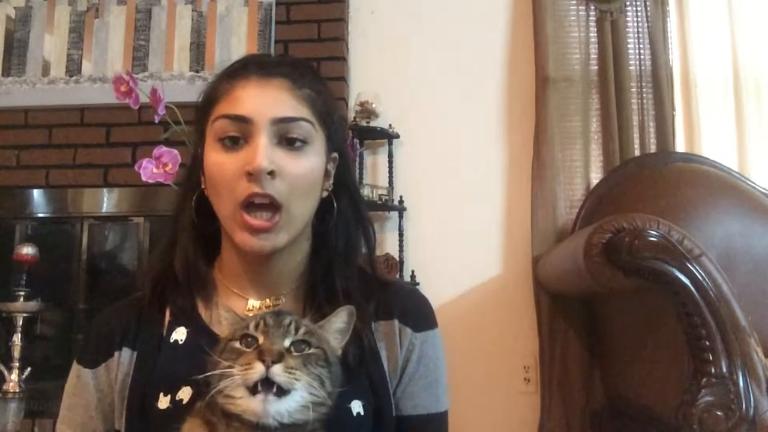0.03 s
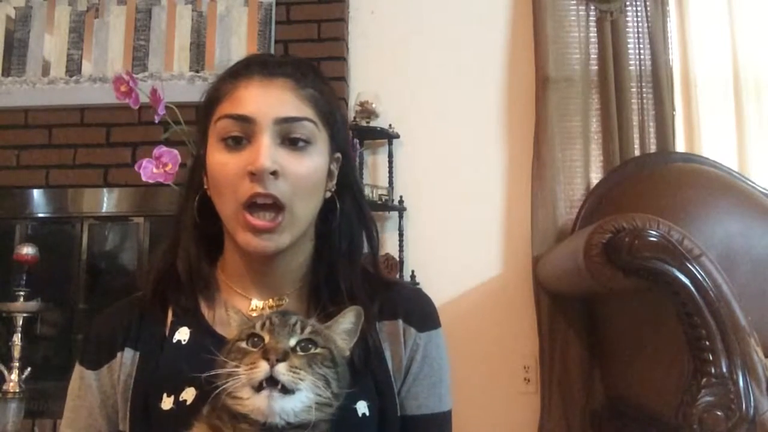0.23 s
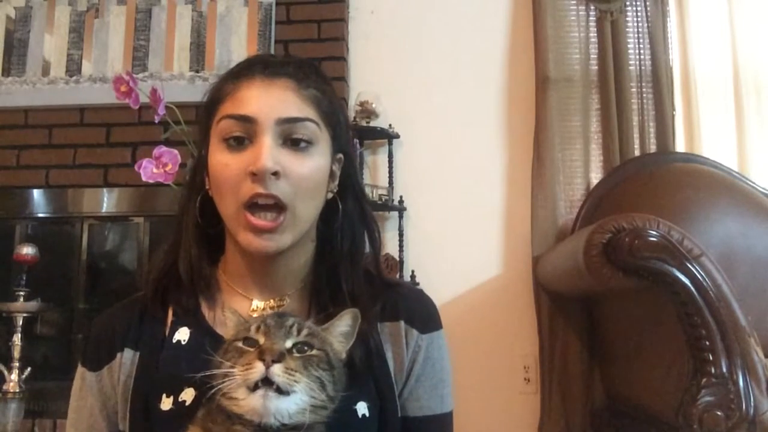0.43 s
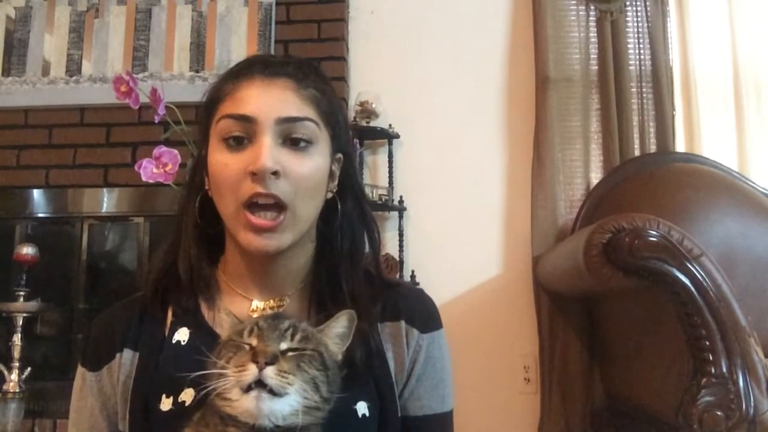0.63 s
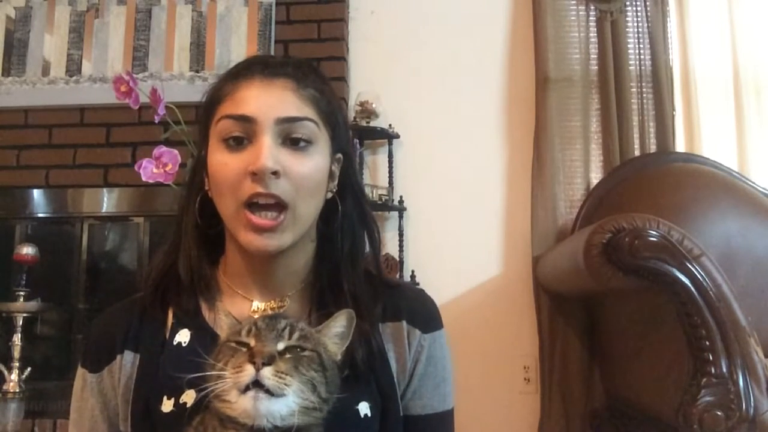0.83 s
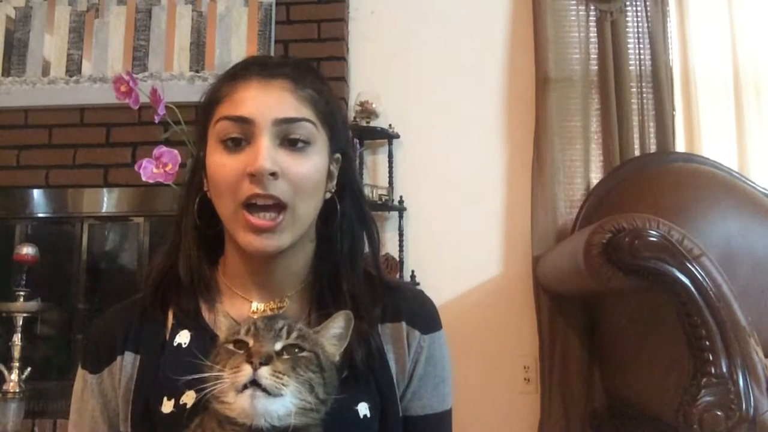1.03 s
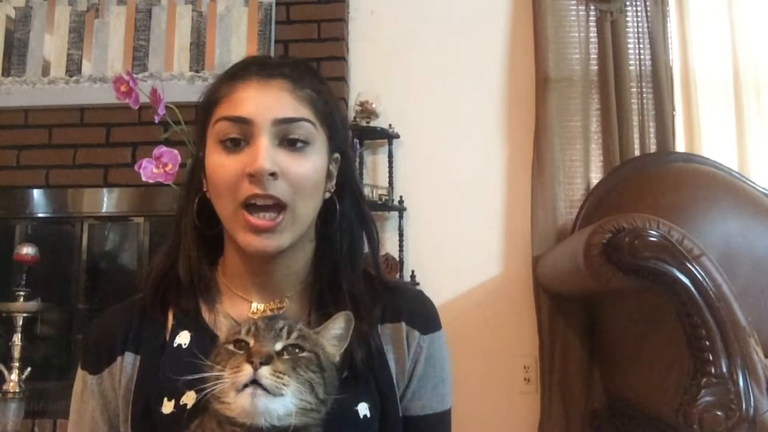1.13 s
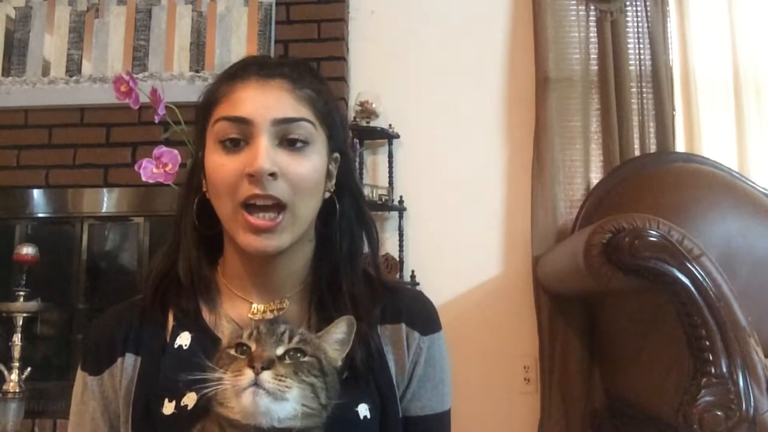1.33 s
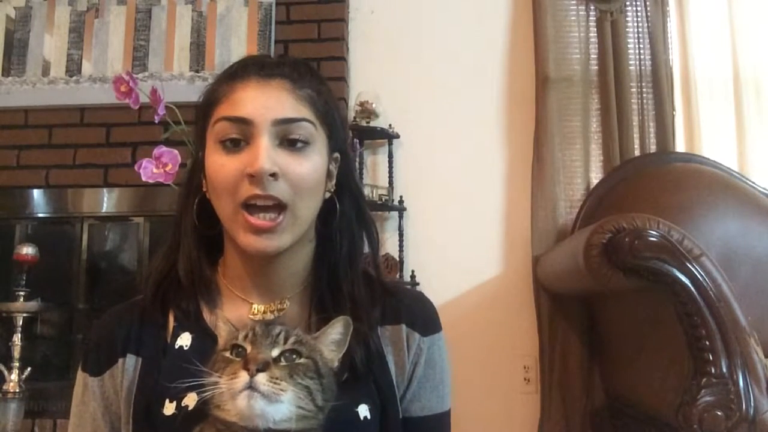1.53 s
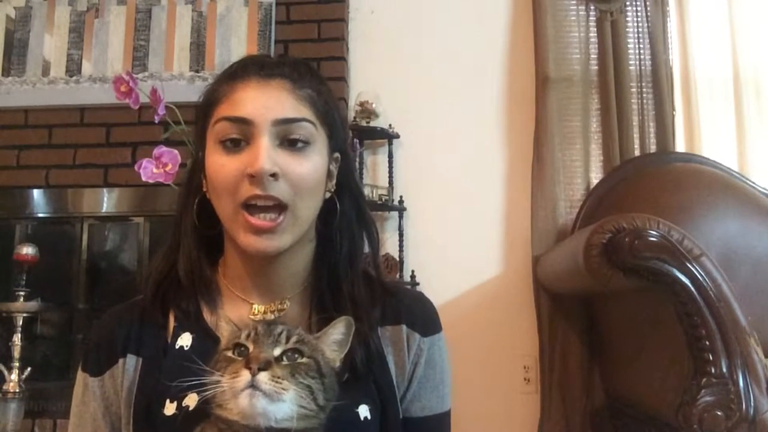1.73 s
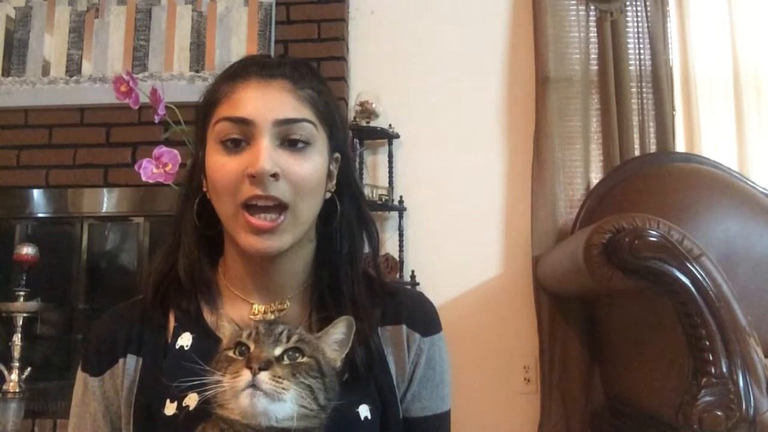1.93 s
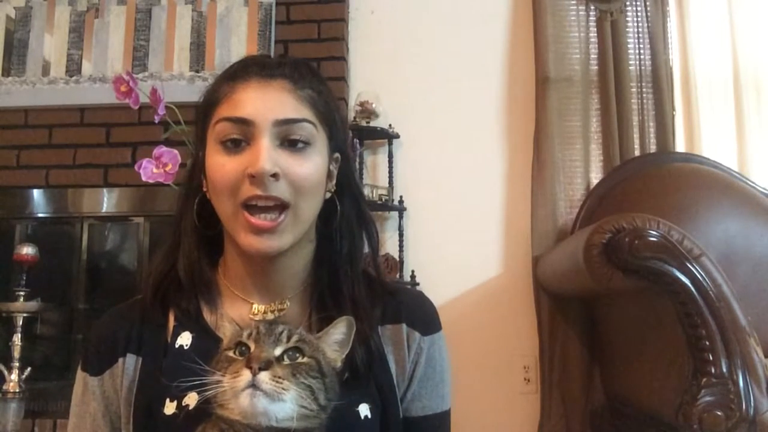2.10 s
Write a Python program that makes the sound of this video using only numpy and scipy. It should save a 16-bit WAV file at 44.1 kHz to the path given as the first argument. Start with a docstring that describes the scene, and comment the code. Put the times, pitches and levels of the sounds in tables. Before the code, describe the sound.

One long cat meow indoors, steady at first, then sinking and turning slightly raspy.

```python
"""One long, close cat meow in a living room, already under way at the start.
Vocal-fold harmonics pass through throat and mouth: the pitch holds, steps down, then sinks as the
mouth narrows and the throat rasps. The mouth shuts with a short nasal hum and a puff of hiss.
The room rings briefly and a small wet lip click follows.
Low rumble, two faint appliance tones and microphone hiss stay underneath."""
import sys
import numpy as np
from scipy import signal
from scipy.fft import rfft, irfft, next_fast_len
from scipy.io import wavfile
from scipy.ndimage import map_coordinates

SR = 44100
rng = np.random.default_rng(int(sys.argv[2]) if len(sys.argv) > 2 else 0)


def generate_wav(signal):
    """Clip the signal to [-1, 1] and save it as 16-bit WAV at the path in sys.argv[1]."""
    frames = np.transpose(np.atleast_2d(signal))
    scaled = np.clip(frames, -1, 1) * 32767
    pcm = np.round(scaled).astype(np.int16)
    wavfile.write(sys.argv[1], SR, pcm)


N = 95388


def meow(t):
    """Vocal-fold harmonics shaped by throat and mouth, rougher as the mouth narrows."""
    # t/s, f/Hz
    pitch = [(0.015, 569.2), (0.08, 562.3), (0.15, 558.1), (0.3, 563.5), (0.45, 560.6), (0.55, 559.9),
             (0.6, 549.7), (0.66, 539.2), (0.72, 533.5), (0.82, 539.1), (0.9, 531.1), (0.99, 512.6),
             (1.06, 487), (1.12, 463.8), (1.15, 426)]
    # t/s, level/dB
    effort = [(0.01, -19), (0.028, -19), (0.19, -24.5), (0.244, -24), (0.394, -29), (0.494, -26.5),
              (0.892, -27), (0.91, -25), (1.0, -28.5), (1.056, -27), (1.136, -30.5), (1.17, -50.5)]
    # t/s, narrowing/0-1, mouth resonance f/Hz
    mouth = [(0, 0, 1765), (.25, .05, 1710), (.38, 0.3, 1944), (.53, .3, 2085), (.58, .45, 1850),
             (.62, 0.7, 2044), (.72, .95, 1840), (.93, 0.99, 1826), (1.06, 1, 1615), (1.14, 1, 1050)]
    jitter, drift, shimmer_db, flutter_db = 0.0016, 0.0021, 0.4326, 1.35
    stop_s, release_s, muffle_from_s = 1.165, 0.01, 0.98
    pitch_hz, = curves(pitch, t)
    effort_db, = curves(effort, t)
    narrowing, mouth_hz = curves(mouth, t)
    catch = swell(t, centre_s=0.597, width_s=0.02)  # voice catches at the pitch step
    roughness = 1 + 1.3 * narrowing + 2.5 * catch
    pitch_ratio = 1 + roughness * jitter * wobble(t, per_s=350) + drift * wobble(t, per_s=55)
    phase = 2 * np.pi * np.cumsum(pitch_hz * pitch_ratio) / SR
    harmonic = np.arange(1, 28)[:, None]
    closing = np.clip((t - muffle_from_s) / (stop_s - muffle_from_s), 0, 1)
    gains = vocal_tract(harmonic * pitch_hz, narrowing, mouth_hz, closing)
    wobbles = np.array([wobble(t, per_s=70) for _ in harmonic])
    flutter = amp(flutter_db * narrowing * (harmonic > 2) * wobbles)
    voice = (gains * flutter * np.sin(harmonic * phase)).sum(0)
    voice /= np.sqrt((gains ** 2).sum(0) / 2)
    voice *= amp(effort_db + shimmer_db * roughness * wobble(t, per_s=130))
    release = np.clip((stop_s - t) / release_s + 1, 0, 1)
    return (voice + breath(t, phase, narrowing)) * release


def vocal_tract(hz, narrowing, mouth_hz, closing):
    """Gain of throat and mouth resonance; the closing lips muffle the upper overtones."""
    # throat, mouth wide: f/Hz, gain/dB
    wide = [(560, -16.5), (1130, -8), (1700, -5), (2260, -9), (2820, -17.5), (3390, -20), (3950, -36.5),
            (5100, -30.5), (5900, -49.5), (6900, -28), (8000, -35.5), (9300, -50), (15000, -61.5)]
    # throat, mouth narrowed: f/Hz, gain/dB
    narrow = [(460, -17), (540, -8.5), (900, 5), (1080, -2), (1600, -1.5), (2150, -6), (2550, -23),
              (2750, -22), (3250, -26), (3900, -37), (4300, -33), (4800, -25), (5800, -38), (6400, -30.5),
              (7000, -16.5), (7600, -33), (8300, -48.5), (9000, -66), (15000, -60.5)]
    peak_db, half_width_hz = 13.5, 353
    muffle_db, muffle_above_hz = 5, 2350
    throat_db = (1 - narrowing) * along(wide, hz) + narrowing * along(narrow, hz)
    mouth_db = peak_db / (1 + ((hz - mouth_hz) / half_width_hz) ** 2)
    lip_loss_db = muffle_db * closing / (1 + (muffle_above_hz / hz) ** 10)
    return amp(throat_db + mouth_db - lip_loss_db)


def breath(t, phase, narrowing):
    """Air let through the folds once a cycle; the narrowed throat adds rasp."""
    # f/Hz, relative level/dB
    air_spectrum = [(300, -21.5), (800, -10), (1100, -13.5), (1320, -7), (1700, 2), (2000, -16.5),
                    (2350, -0.5), (2650, -5), (3000, -18), (3300, -8.5), (3900, -22.5), (5100, -9),
                    (6000, -18.5), (7100, -3), (8200, -15), (9200, -50), (10800, -24), (12300, -44.5),
                    (14500, -24.5), (15500, -31)]
    # t/s, level/dB
    air_level = [(0, -49.5), (.06, -46), (.2, -52.5), (.45, -53), (.72, -51), (.88, -57.5), (1.05, -64),
                 (1.15, -57.5)]
    # f/Hz, relative level/dB
    rasp_spectrum = [(1250, -40), (1480, -9), (1800, 7), (2050, -4), (2280, -12), (2450, -51)]
    folds_open = 1 + np.cos(phase)
    air_db, = curves(air_level, t)
    air = amp(air_db) * noise(t, air_spectrum, gate=folds_open)
    rasp = amp(-54) * narrowing * noise(t, rasp_spectrum, gate=folds_open)
    return air + rasp


def mouth_shuts(t):
    """The last few cycles hum through the nose, with a puff of hiss."""
    # f/Hz, relative level/dB
    puff_spectrum = [(500, -4), (2500, -2), (3800, -8), (4650, -1.5), (5600, -11.5), (7000, -9),
                     (9000, -20.5), (15000, -15.5)]
    hum_hz, hum_db, puff_db = 401, -36.5, -59
    hum = amp(hum_db) * np.sqrt(2) * np.sin(2 * np.pi * hum_hz * t)
    puff = amp(puff_db) * noise(t, puff_spectrum)
    return hum * swell(t, centre_s=1.16, width_s=0.0068) + puff * swell(t, centre_s=1.18, width_s=0.028)


def lip_click(t):
    """A tiny wet smack: three quick cracks, each with short resonances."""
    # t/s, gain/dB
    clicks = [(1.3762, -56), (1.379, -43.5), (1.385, -56)]
    # f/Hz, relative level/dB, t60/s
    modes = [(1870, -1, 0.011), (2946, -1, 0.0044), (6450, -6, .002)]
    crack_db, crack_t60_s = -13, 0.0023
    smack = np.zeros(len(t))
    age_s = np.arange(SR // 20) / SR
    ring = sum(amp(db - 60 * age_s / t60_s) * np.sin(2 * np.pi * hz * age_s) for hz, db, t60_s in modes)
    for onset_s, gain_db in clicks:
        crack = amp(crack_db - 60 * age_s / crack_t60_s) * rng.standard_normal(len(age_s))
        start = np.searchsorted(t, onset_s)
        smack[start:start + len(age_s)] += amp(gain_db) * (ring + crack)
    return smack


def room(x):
    """Reverberation of x from a decaying noise tail; the top treble dies first."""
    # f/Hz, t60/s
    decay = [(200, .55), (400, .5), (900, .42), (1400, 0.47), (2400, 0.44), (4700, .6), (7000, .3),
             (12000, 0.067)]
    # f/Hz, relative gain/dB
    colour = [(330, 0), (420, -5), (600, -9.5), (1100, -6.5), (1400, 1.5), (1700, -5.5), (2000, 0.5),
              (2400, -3), (4100, -7.5), (4650, 2), (5200, -3), (7000, 1), (12000, -5.5)]
    delay_s, wet_db = 0.008, -10
    hz, age_s, spectra = signal.stft(rng.standard_normal(SR // 2), SR, nperseg=256)
    fade = amp(-60 * age_s / along(decay, hz)[:, None])
    _, tail = signal.istft(spectra * fade, SR, nperseg=256)
    tail = np.pad(tail / np.linalg.norm(tail), (round(delay_s * SR), 0))
    reverb = signal.fftconvolve(x, tail)[:len(x)]
    return filtered(reverb, lambda hz: amp(wet_db + along(colour, hz)))


def background(t):
    """Low household rumble, two wavering appliance tones and microphone hiss."""
    # appliance tones: f/Hz, level/dB
    drones = [(87, -71.5), (312, -68)]
    # f/Hz, relative level/dB
    rumble_spectrum = [(12, -53), (20, -21.5), (76, -2), (245, -9.5), (307, -8.5), (437, -11), (471, -11),
                       (508, -14), (652, -13), (777, -19.5), (1080, -17.5), (2590, -34.5), (8000, -40.5),
                       (10400, -75.5), (17600, -120)]
    # f/Hz, relative level/dB
    hiss_spectrum = [(3000, -7.5), (8000, -3.5), (10000, 1.5), (15000, -5)]
    rumble_db, hiss_db = -58.5, -82.5
    tones = sum(amp(db) * np.sqrt(2) * np.sin(2 * np.pi * hz * t + wobble(t, per_s=14))
                for hz, db in drones)
    return amp(rumble_db) * noise(t, rumble_spectrum) + tones + amp(hiss_db) * noise(t, hiss_spectrum)


def amp(db):
    """Decibels to gain."""
    return 10 ** (np.asarray(db) / 20)


def unit(x):
    """x at rms 1."""
    return x / np.sqrt(np.mean(x ** 2) + 1e-20)


def along(points, hz):
    """Rows of (f/Hz, value) interpolated on a log frequency axis."""
    knots_hz, values = np.transpose(points)
    return np.interp(np.log(hz + 1), np.log(knots_hz + 1), values)


def curves(rows, t):
    """Each column after t/s, interpolated at times t."""
    knots_s, *columns = np.transpose(rows)
    return [np.interp(t, knots_s, column) for column in columns]


def wobble(t, per_s):
    """Smooth random curve, per_s knots a second."""
    position = (t - t[0]) * per_s
    return map_coordinates(rng.standard_normal(len(t) // 10), [position], mode="mirror")


def filtered(x, gain):
    """Zero-phase filter with response gain(hz)."""
    size = next_fast_len(len(x) + SR // 2)
    return irfft(rfft(x, size) * gain(np.fft.rfftfreq(size, 1 / SR)), size)[:len(x)]


def noise(t, spectrum, gate=1):
    """Noise of rms 1, gated, then coloured."""
    white = gate * rng.standard_normal(len(t))
    return unit(filtered(white, lambda hz: amp(along(spectrum, hz))))


def swell(t, centre_s, width_s):
    """Gaussian envelope."""
    return np.exp(-0.5 * ((t - centre_s) / width_s) ** 2)


def scene():
    """The cat in its room, already ringing at t = 0; the click is close and dry."""
    lead_s = 0.3
    t = np.arange(-round(lead_s * SR), N) / SR
    cat = meow(t) + mouth_shuts(t)
    return (cat + room(cat) + lip_click(t) + background(t))[None, -N:]


def record(dry):
    """The camera thins the deep bass and passes nothing above its band limit."""
    low_cut_hz, top_hz = 48, 15300
    return filtered(dry[0], lambda hz: (hz < top_hz) * hz ** 2 / np.hypot(hz ** 2, low_cut_hz ** 2))[None]


dry = scene()
out = record(dry)
generate_wav(out)
```